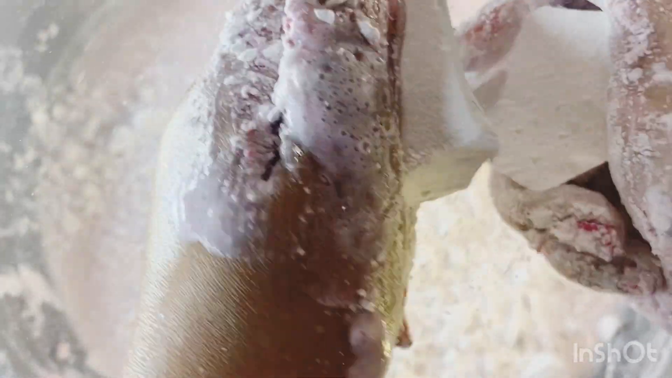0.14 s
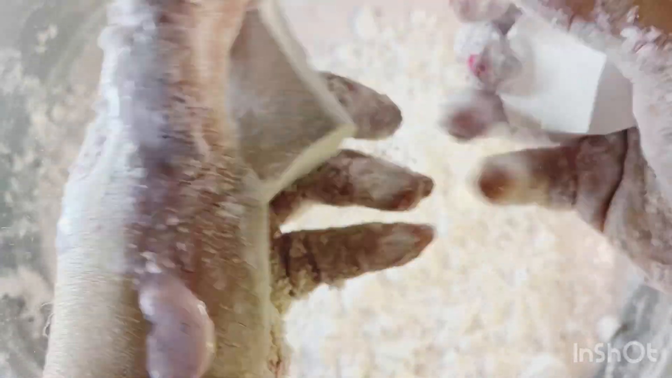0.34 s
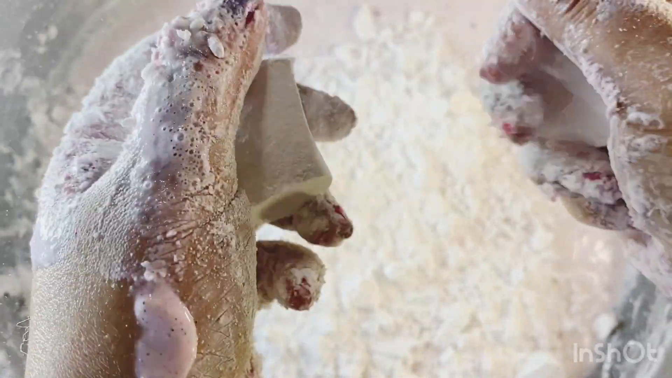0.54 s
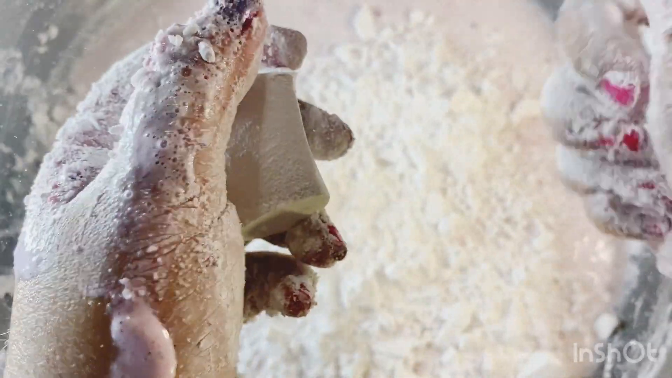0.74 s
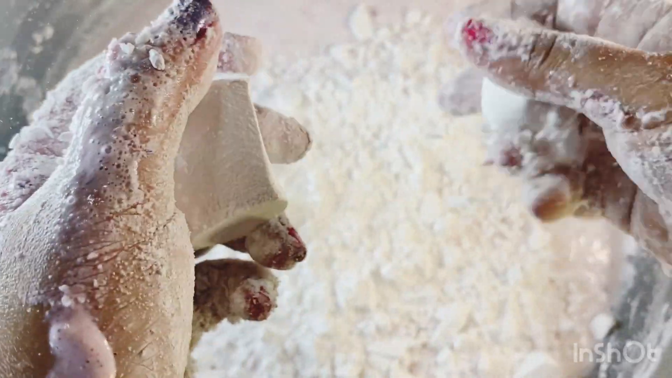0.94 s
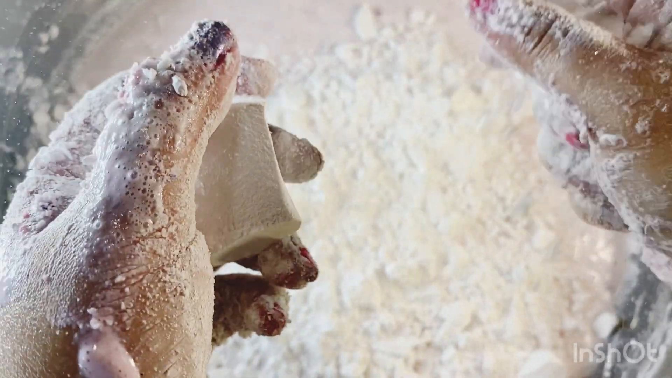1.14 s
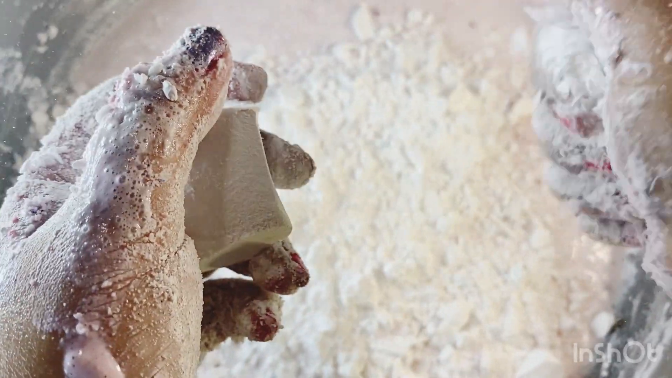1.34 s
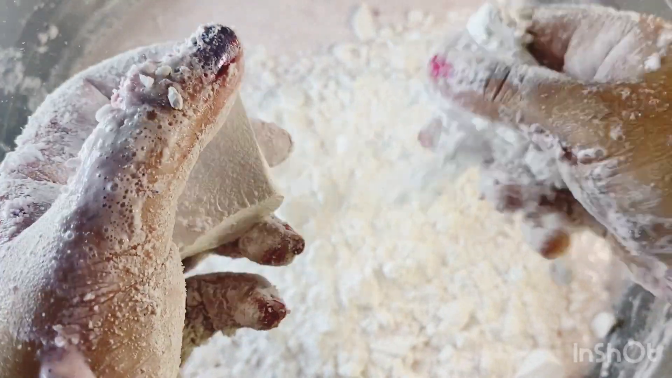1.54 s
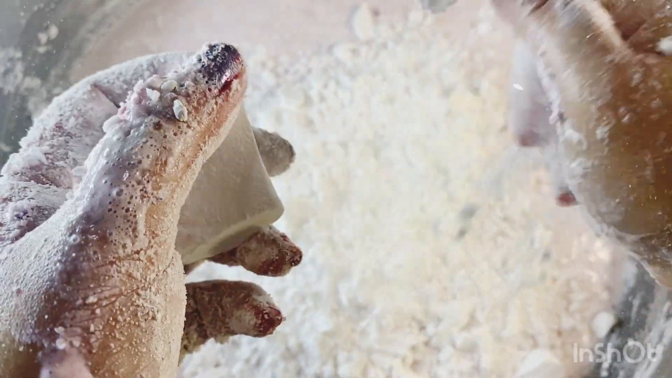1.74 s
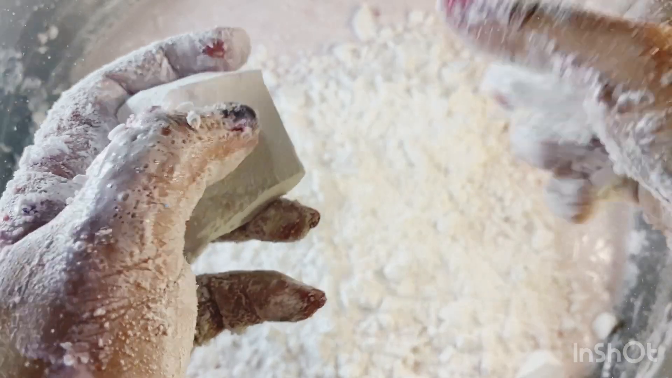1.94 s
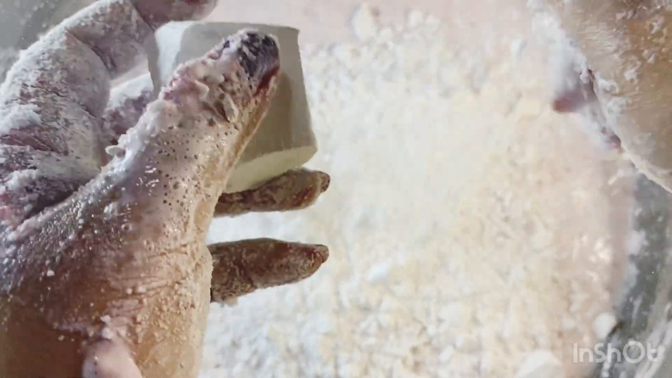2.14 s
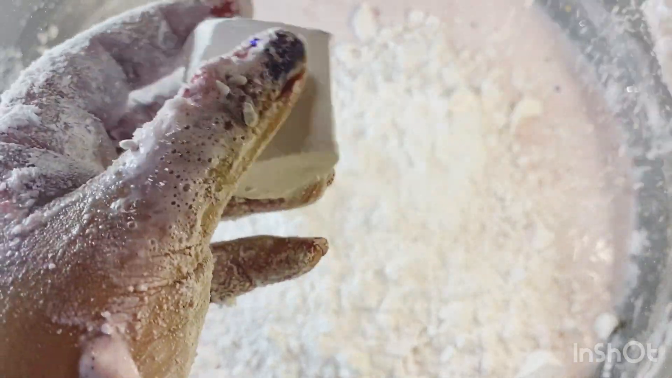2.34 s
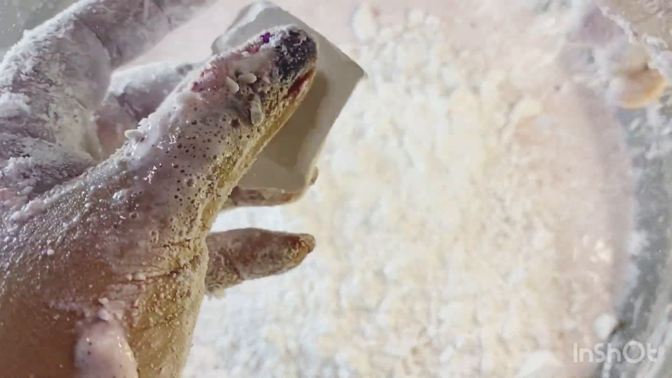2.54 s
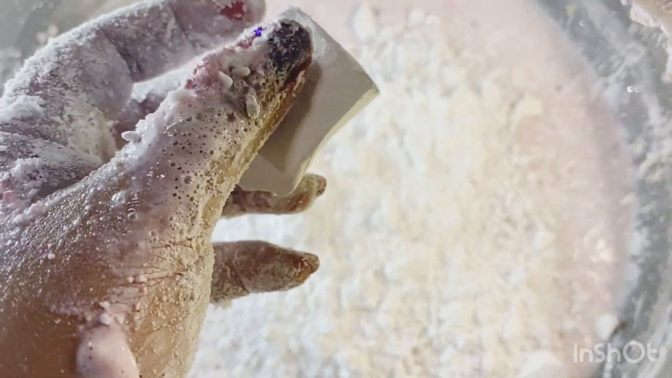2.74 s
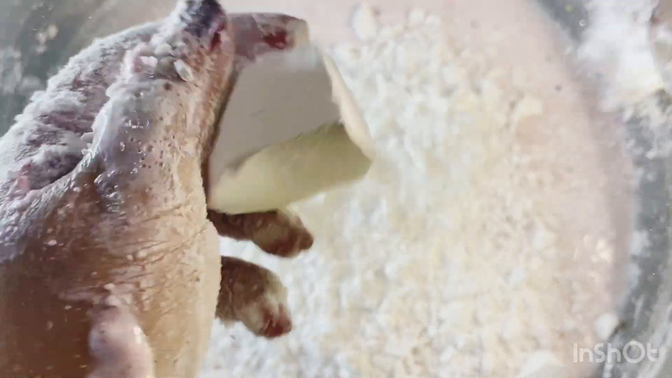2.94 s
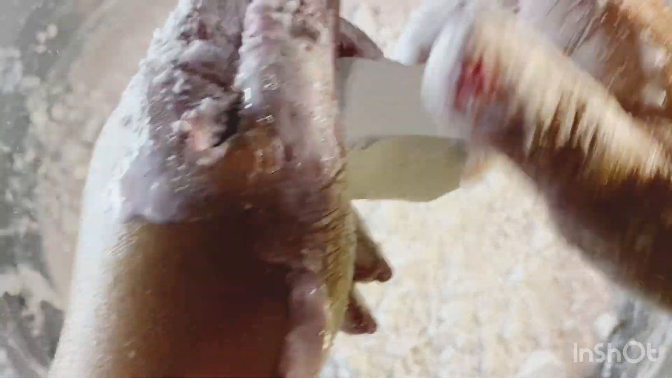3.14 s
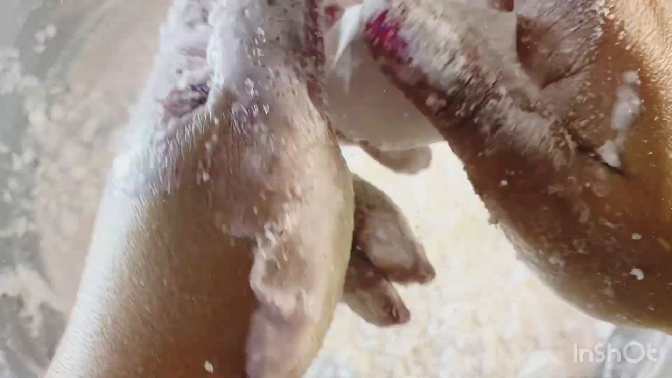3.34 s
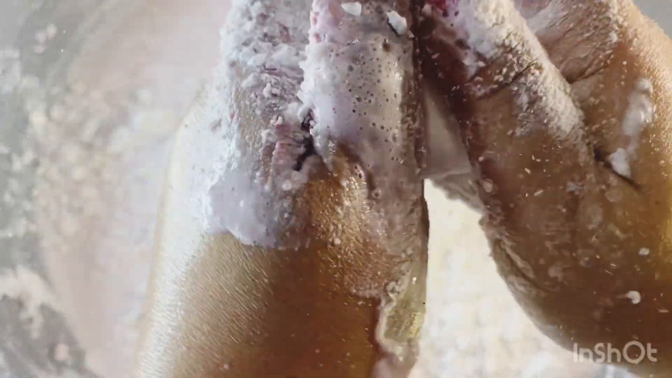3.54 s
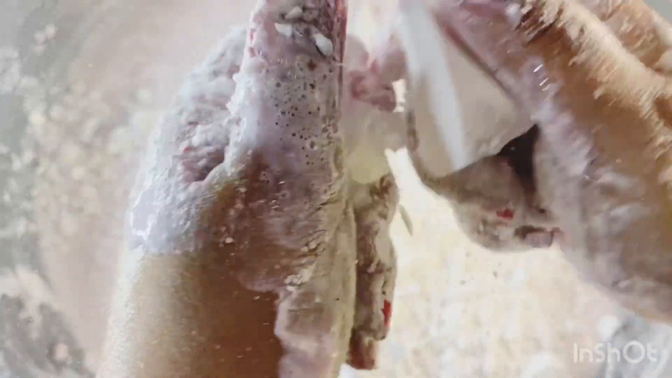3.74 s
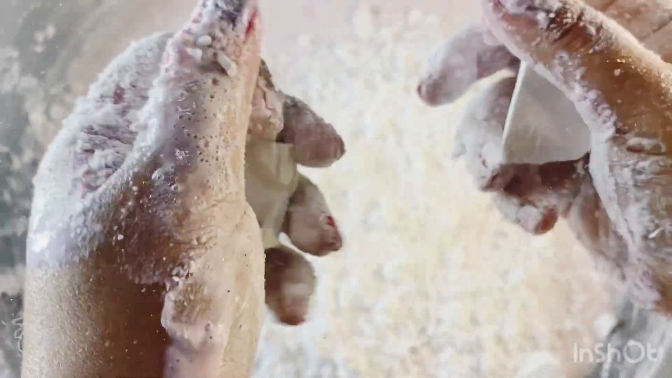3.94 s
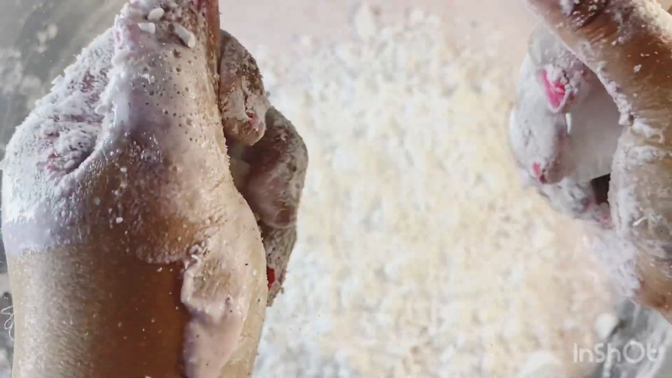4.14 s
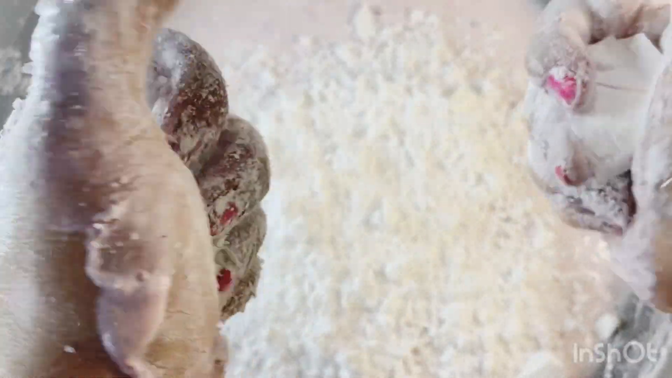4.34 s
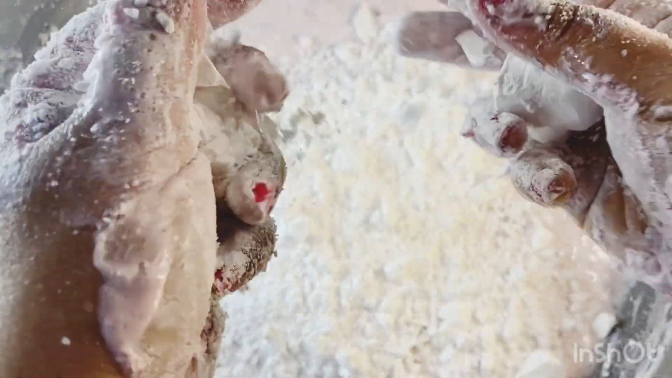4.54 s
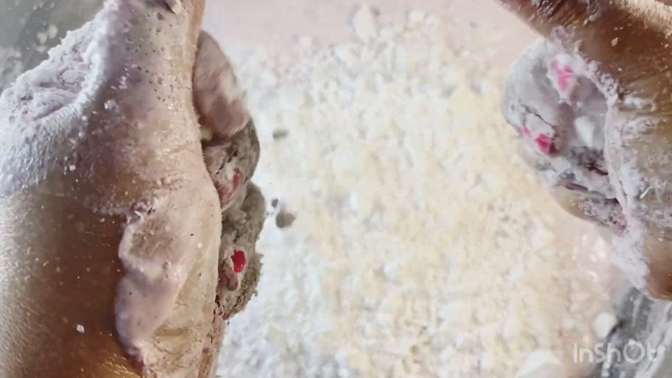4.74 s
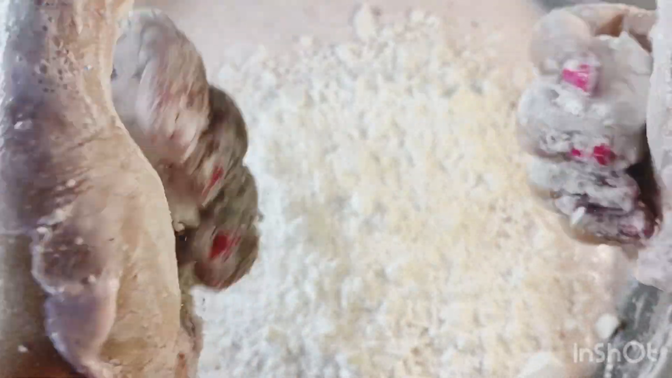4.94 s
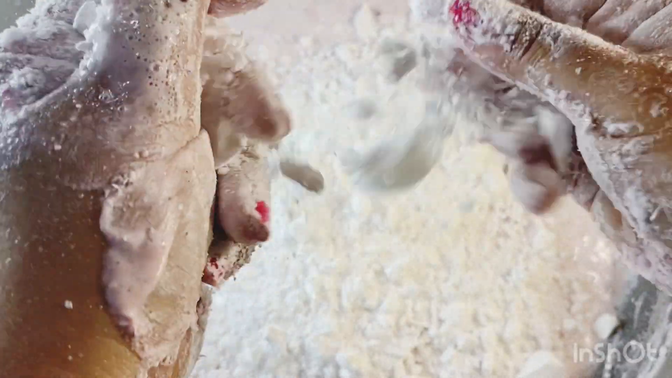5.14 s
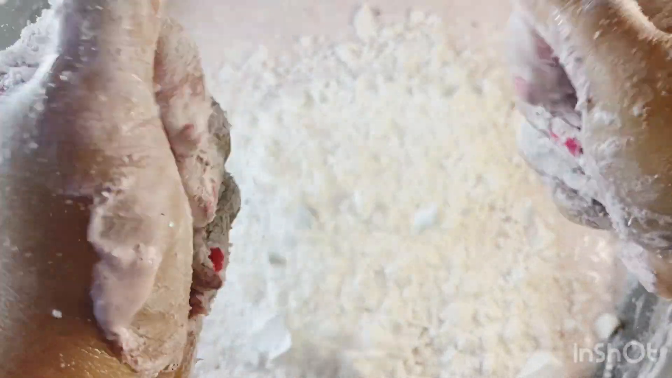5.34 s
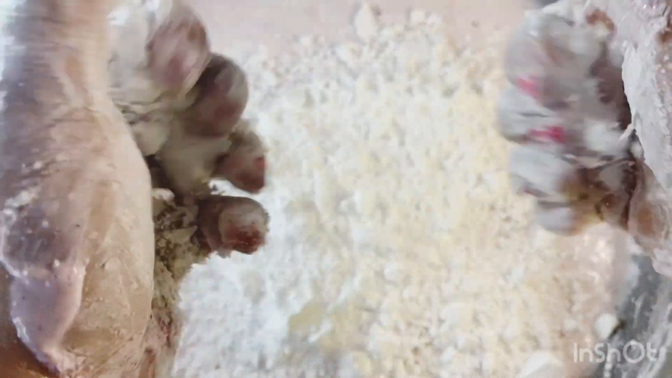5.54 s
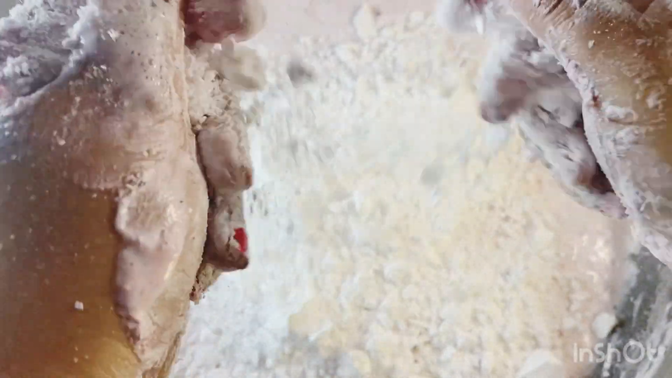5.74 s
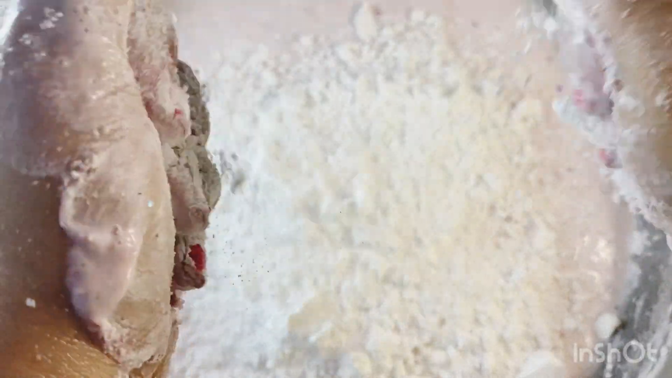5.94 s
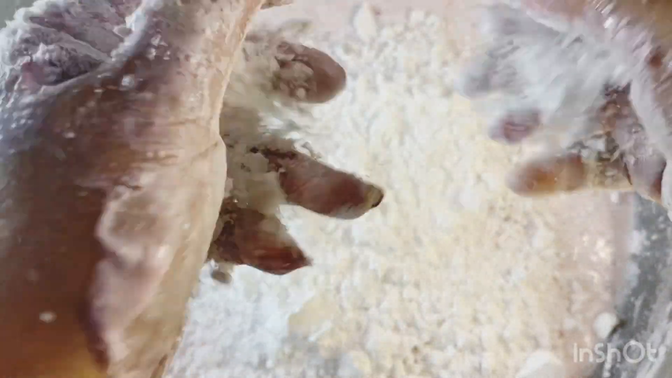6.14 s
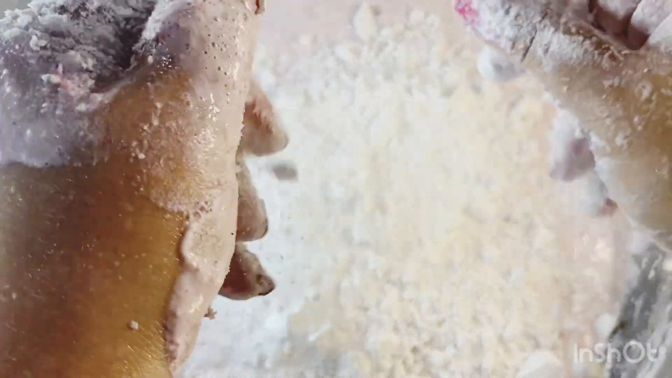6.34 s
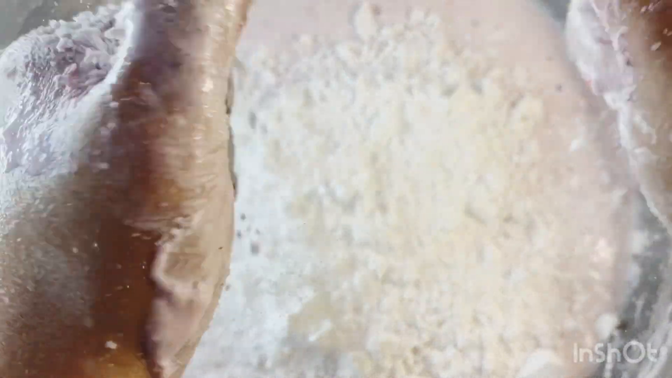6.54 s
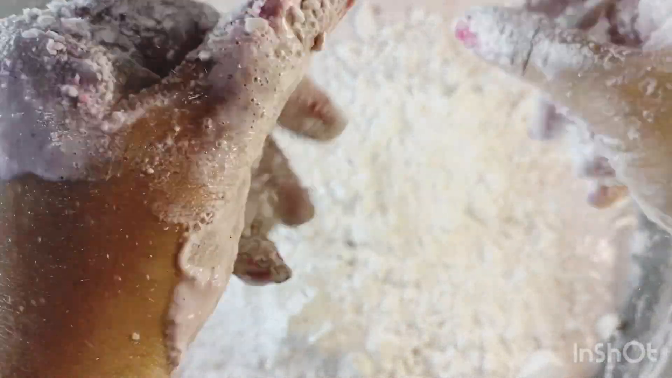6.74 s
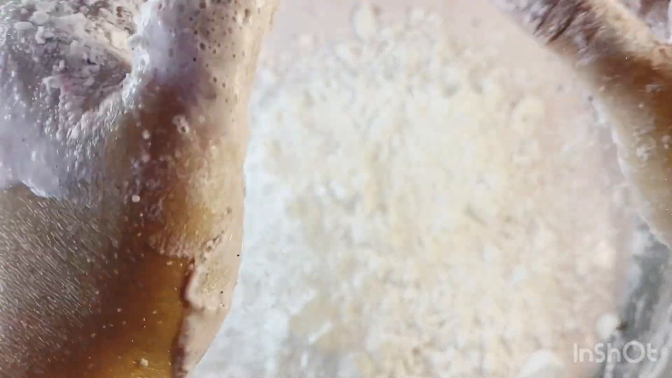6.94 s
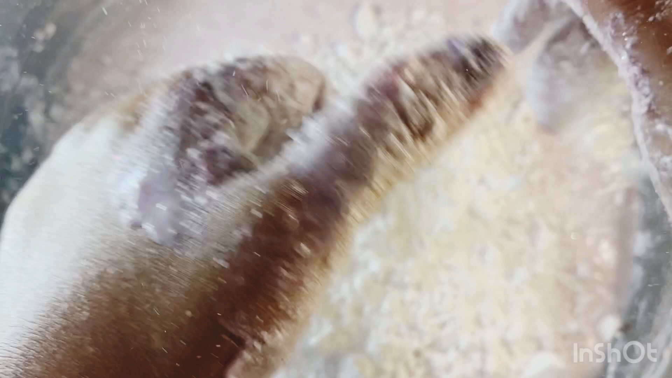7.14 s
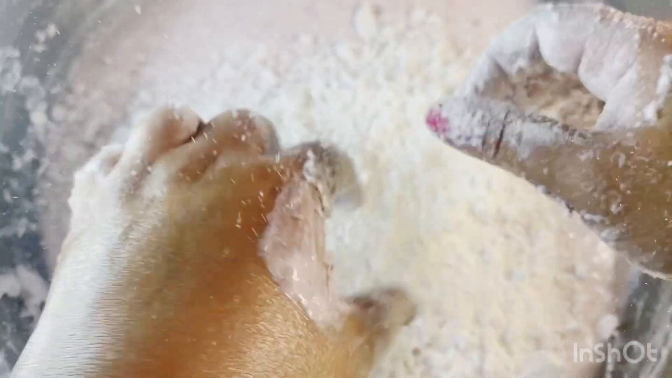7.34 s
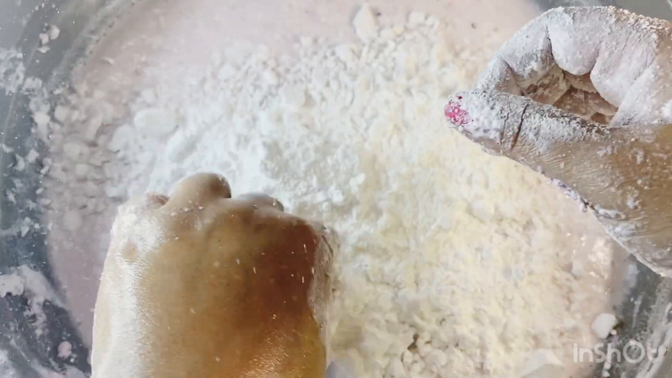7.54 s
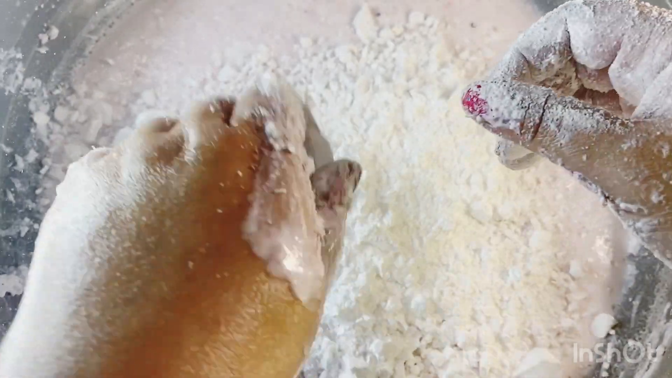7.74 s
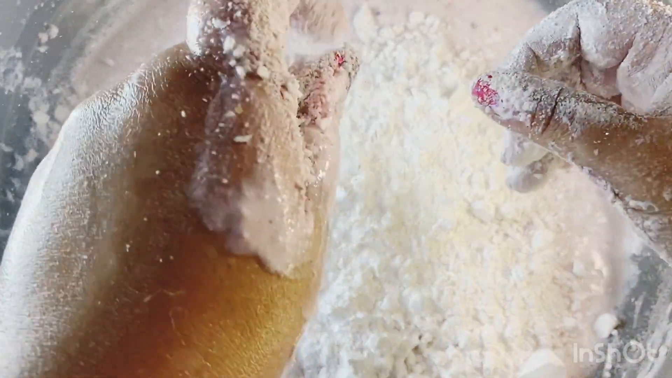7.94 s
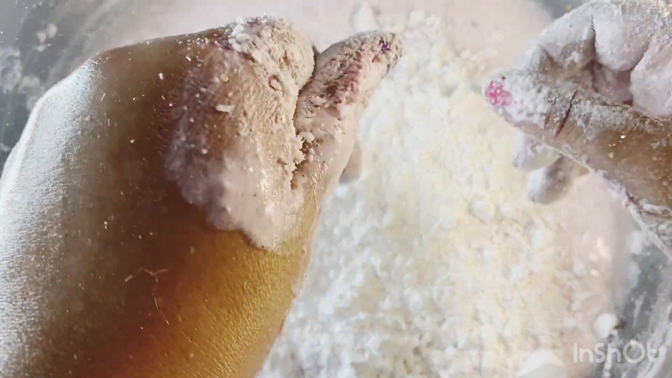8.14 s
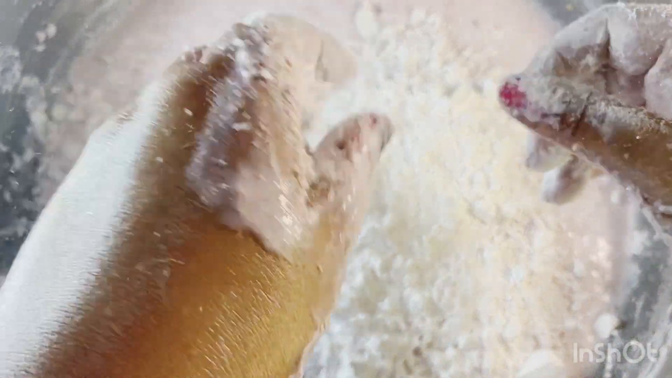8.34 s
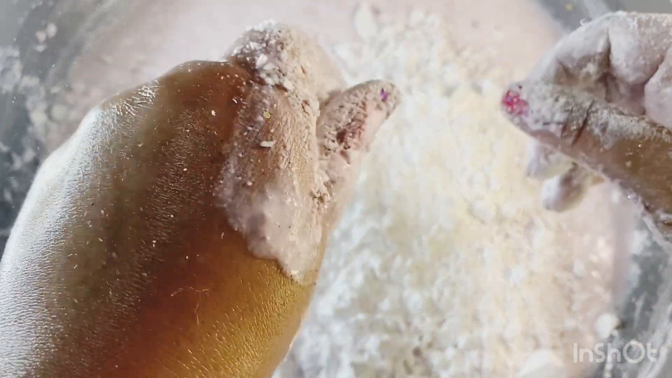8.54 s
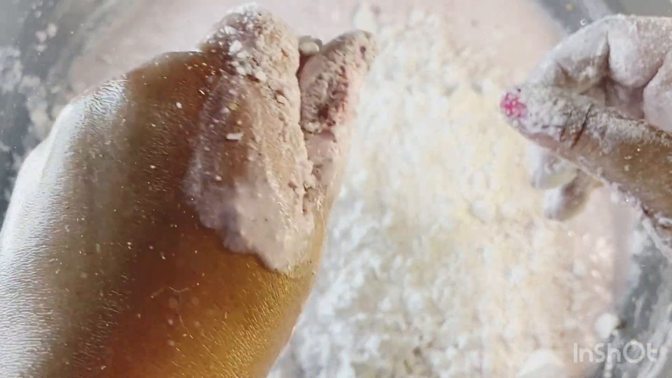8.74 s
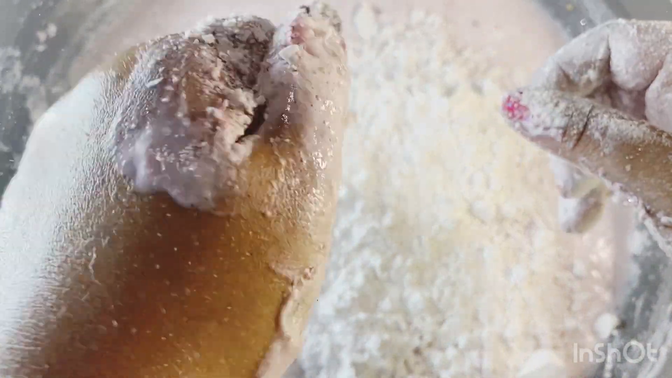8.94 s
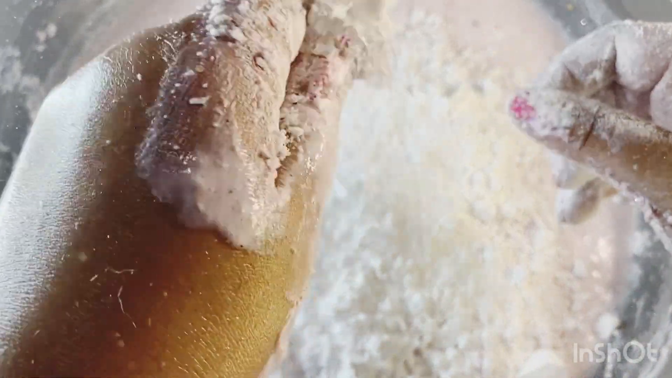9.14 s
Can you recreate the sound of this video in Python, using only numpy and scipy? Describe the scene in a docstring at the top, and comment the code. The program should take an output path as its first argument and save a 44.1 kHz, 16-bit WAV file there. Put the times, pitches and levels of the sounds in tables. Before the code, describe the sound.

Dry chalk blocks snap and crumble in the hands over a bowl, gritty crackle and loud cracks ringing into a long, smooth reverberation.

```python
"""Over a bowl of paste, in a long, smooth reverberation, dry chalk blocks are crushed by hand close up.
Each break is a brief burst of fractures, split into hollow body, crack and splinter; big pieces ring on.
Between the breaks grit crackles as random clicks, blocks rub in uneven slips and powder rustles as noise.
Lumps knock dully on the damped modes of the bowl; still air, hum and handling rumble lie beneath."""
import sys
import numpy as np
from scipy import signal
from scipy.io import wavfile

SR = 44100
rng = np.random.default_rng(int(sys.argv[2]) if len(sys.argv) > 2 else 0)


def wav_record(signal):
    """Record a signal, one row per channel, as 16-bit PCM in the file named by sys.argv[1]."""
    frames = np.transpose(np.atleast_2d(signal))
    bounded = np.clip(frames, -1, 1)
    # unit amplitude maps onto the largest positive 16-bit level
    quanta = np.round(bounded * 32767).astype(np.int16)
    wavfile.write(sys.argv[1], SR, quanta)


N = 406161
LEAD = SR // 10  # samples of run-up: the crushing is already under way at time zero
TIME = np.arange(-LEAD, N) / SR
SNAP_S = 0.004  # short sounds take their level as rms over this time


def from_db(db):
    """Decibels to gain."""
    return 10 ** (np.asarray(db) / 20)


def rms_one(x):
    """Scale to unit rms."""
    return x / np.sqrt(np.mean(x ** 2) + 1e-20)


def in_time(rows):
    """Each column of a curve at every sample."""
    s, *columns = np.transpose(rows)
    return [np.interp(TIME, s, column) for column in columns]


def at_hz(points, hz):
    """Read a table on a log-frequency axis."""
    table_hz, values = np.array(points).T
    return np.interp(np.log(hz), np.log(table_hz), values)


def band(x, low_hz, high_hz):
    """Butterworth band-pass."""
    edges = [low_hz, min(high_hz, 0.48 * SR)]
    return signal.sosfilt(signal.butter(2, edges, "band", fs=SR, output="sos"), x)


def bell(x, hz, q, gain_db):
    """A resonant peak or notch."""
    a = from_db(gain_db / 2)
    w = 2 * np.pi * hz / SR
    k = np.sin(w) / (2 * q)
    c = -2 * np.cos(w)
    return signal.lfilter([1 + k * a, c, 1 - k * a], [1 + k / a, c, 1 - k / a], x)


def add(track, s, sound):
    """Mix a sound in at time s."""
    at = max(round(s * SR) + LEAD, 0)
    track[at:at + len(sound)] += sound[:len(track) - at]


def swell(start_s, hold_s, rise_s, fall_s, t=TIME):
    """Exponential attack, hold and release of height 1; rise and fall are time constants."""
    before = np.minimum(t - start_s, 0) / rise_s
    after = np.maximum(t - start_s - hold_s, 0) / fall_s
    return np.exp(np.maximum(before - after, -30))


def noise_bands(size, channels=1, count=24):
    """Narrow bands of noise, unrelated between channels, as (centre Hz, noise)."""
    edges = np.geomspace(18, 17000, 25)[:count + 1]
    white = rng.standard_normal((2, channels, size))
    for k, (low, high) in enumerate(zip(edges, edges[1:])):
        yield np.sqrt(low * high), band(white[k % 2], low, high)


def fracture(t, run_s, ragged, crumble, crumble_s):
    """One sharp release, a dying run of smaller ones as the crack travels, then a brief crumbling."""
    decay = ragged * np.exp(-t / run_s) + crumble * np.exp(-t / crumble_s)
    burst = rng.standard_normal(len(t)) * decay
    burst[0] += 1
    return burst


def snaps(breaks, ring_q=3.9, ring_db=8, body_db=0, crack_db=0, splinter_db=0, top_db=-12):
    """Each fracture rings in its piece and is heard as hollow body, crack and bright splinter."""
    out = np.zeros(len(TIME))
    t = np.arange(SR // 50) / SR
    for s, ring_hz, body, crack, splinter in breaks:
        burst = fracture(t, run_s=0.00087, ragged=0.27, crumble=0.01, crumble_s=0.0029)
        burst = bell(burst, ring_hz, ring_q, ring_db)
        # the cupped hand hollows the sound
        burst = bell(bell(burst, 600, 4.8, -5.0), 1600, 14.0, -2.4)

        hollow = band(band(burst, 310, 1300), 160, 4800)
        middle = band(burst, 1590, 3100)
        bright = bell(band(burst, 4020, 10180), 10400, 8, -5.0)
        bright = bright + from_db(top_db) * band(burst, 11200, 13000)

        parts = from_db(body + body_db) * rms_one(hollow)
        parts = parts - from_db(crack + crack_db) * rms_one(middle)
        parts = parts + from_db(splinter + splinter_db) * rms_one(bright)
        add(out, s, parts * np.sqrt(SNAP_S * SR / len(t)))
    return out


def mode(hz, db, t60, wave=np.sin):
    """One dying resonance, its level as rms over SNAP_S; a cosine starts it with a sudden release."""
    t = np.arange(SR // 20) / SR
    ring = wave(2 * np.pi * hz * t) * np.exp(-np.log(1000) * t / t60)
    return from_db(db) * rms_one(ring) * np.sqrt(SNAP_S * SR / len(t))


def aftermath(thud_hz=125, thud_t60=0.033):
    """The biggest breaks leave their pieces ringing, neighbouring modes in opposite sense, and jar the hand."""
    # larger pieces that ring on: t/s, modes [(f/Hz, level/dB before the band-pass, t60/s), ..]
    ringing_pieces = [(-.012, [(1625, -12, 0.014), (2470, -14.5, 0.0083)]),
                      (.0005, [(1480, -18.5, 0.0055)]), (.0427, [(2860, -22, .006), (4400, -28, 0.0025)]),
                      (0.5364, [(763, -23, 0.0063), (2310, -18, 0.012), (2770, -19, 0.0084),
                      (3870, -30.5, .007), (6050, -23.5, .004), (9450, -24, .008)]),
                      (3.556, [(724, -18, 0.004), (1650, -13.5, 0.0036), (2280, -6, 0.0059)]),
                      (3.5664, [(5500, -14.5, 0.0031), (7150, -21, .008), (8500, -16, .003)]),
                      (4.758, [(4340, -19.5, 0.0032), (7600, -19.5, 0.0026)]),
                      (6.351, [(7820, -26.5, 0.0023)]), (7.7354, [(3750, -42.5, .006), (6700, -46, .004)]),
                      (8.6345, [(1240, -33, 0.012), (1960, -22, 0.016), (2580, -21.5, 0.0092),
                      (3000, -22.5, 0.0059), (3560, -21.5, 0.016), (4230, -24.5, 0.0068),
                      (5440, -26.5, .005), (6600, -23, 0.004)])]
    # low thuds as the hand recoils from a block giving way: t/s, level/dB
    recoils = [(0.538, -26), (1.023, -35), (1.118, -40.5), (3.557, -27.5), (4.759, -40.5)]
    out = np.zeros(len(TIME))
    for s, modes in ringing_pieces:
        ring = sum((-1) ** k * mode(*row, np.cos) for k, row in enumerate(modes))
        add(out, s, band(ring, 170, 11000))
    for s, db in recoils:
        add(out, s, mode(thud_hz, db, thud_t60))
    return out


def chips(grind_db, coarse, per_s=10, full_db=-50, size_db=-50, follows=0.46, spread_db=3,
          body_db=-10, crack_db=-2):
    """Small flakes snap off at random, more often and louder the harder the fingers grind; rows for snaps()."""
    effort_db = np.minimum(grind_db - full_db, 3)
    rate = per_s * coarse * from_db(0.6 * effort_db)
    at = np.flatnonzero(rng.random(len(TIME)) < rate / SR)
    chance = rng.standard_normal((len(at), 4))
    ring_hz = np.clip(4200 * 2 ** (1.04 * chance[:, 0]), 1800, 9000)
    overall_db = size_db + follows * effort_db[at]
    levels = overall_db[:, None] + [body_db, crack_db, 0] + spread_db * chance[:, 1:]
    return list(np.column_stack([TIME[at], ring_hz, levels]))


def grinding(press_s=0.032, release_s=0.04, trickle_db=-16, trickle_s=0.57):
    """Level (dB), brightness (dB) and coarse share: squeezes swell, hold and let go; crumbs trickle after."""
    # squeezes and rubs of the fingers:
    # start t/s, hold/s, grit level/dB, brightness/dB, share of coarse grains (0-1)
    squeezes = [(-.04, 0.045, -28.5, -5.5, 0.6), (.3, 0.087, -53, -2, 0.3), (1.05, 0.24, -47, -1.5, 0.85),
                (1.11, .04, -42.5, 3, 0.9), (1.62, 0.12, -49, 0, 0.78), (1.831, 0.035, -52.5, 0.5, 0.47),
                (2.041, 0.069, -50, 1, 0.97), (2.22, 0.046, -56, 0, 0.9), (2.62, 0.29, -59.5, 1, 0.64),
                (3.03, 0.088, -61.5, -6, 0.46), (3.591, 0.064, -38, -3.5, 0.96),
                (3.721, 0.095, -45, 4.5, 0.3), (3.88, 0.051, -50.5, 2.5, 0.43),
                (4.18, 0.053, -43.5, 2.5, 1), (4.56, 0.32, -48.5, 0, 0.6), (5.121, 0.027, -45, 4, .8),
                (5.2, 0.083, -45, 3.5, 0.56), (5.3, 0.19, -48, -2, 0.98), (5.689, 0.22, -50, 3, 0.86),
                (6.045, 0.014, -48.5, 0, 0.17), (6.29, 0.12, -51.5, 0.5, 0.5),
                (6.49, 0.048, -54, -2.5, 0.3), (6.819, 0.053, -55.5, -2, 0.66), (6.989, 0.013, -47.5, 0, 0),
                (7.169, 0.085, -63.5, 6, 0.7), (7.73, 0.042, -62.5, 1, 0.73), (9.03, 0.22, -64.5, 5, .3)]
    t = TIME[::40]
    power = colour = coarse = 0
    for s, hold_s, db, bright_db, share in squeezes:
        press = swell(s, hold_s, press_s, release_s, t)
        trickle = from_db(trickle_db) * swell(s, hold_s, press_s, trickle_s, t)
        own = (from_db(db) * np.maximum(press, trickle)) ** 2
        power = power + own
        # the stronger squeeze decides the colour and the grain
        colour = colour + own * bright_db
        coarse = coarse + own * share
    curves = 10 * np.log10(power), colour / power, np.clip(coarse / power, 0, 1)
    return [np.interp(TIME, t, curve) for curve in curves]


def grit(grind_db, bright_db, per_s, spread_db, own_db, level_db):
    """Tiny grains give way at random, each with a size and colour of its own."""
    # colour of the grit: f/Hz, level/dB
    grain_colour = [(300, 4), (600, 3.5), (1100, 0), (1500, 3), (2300, 5.5), (3400, 1.5), (5500, -3),
                    (8000, 2.5), (10500, -10.5), (15000, -30)]
    at = np.flatnonzero(rng.random(len(TIME)) < per_s / SR)
    size_db = spread_db * np.minimum(rng.exponential(1, len(at)), 4.5)
    sizes = from_db(size_db) * rng.choice([-1, 1], len(at))
    edges = np.geomspace(220, 16000, 14)
    out = 0
    for low, high in zip(edges, edges[1:]):
        hz = np.sqrt(low * high)
        tilt_db = bright_db[at] * np.clip(np.log2(hz / 3500), -1, 1)
        chance_db = own_db * np.clip(rng.standard_normal(len(at)), -1, 1)
        clicks = np.full(len(TIME), 1e-18)
        clicks[at] = sizes * from_db(at_hz(grain_colour, hz) + tilt_db + chance_db)
        out = out + band(clicks, low, high)
    return from_db(grind_db + level_db) * rms_one(out)


def knocks(contact_hz=1500, level_db=0, scuff_db=-21, scuff_s=0.0048, attack_s=0.0004):
    """A soft blow rings the damped bowl; harder ones reach the upper modes and scuff as they settle."""
    # dull knocks of lumps and hands in the bowl: t/s, level/dB before the modes, pitch f/Hz, hardness/dB
    blows = [(.163, -10.5, 383, -5), (.177, -7.5, 343, 4.5), (2.754, -38, 428, 15.5), (3.397, -45, 380, 9),
             (3.424, -35.5, 360, 10), (3.495, -34, 730, -8), (4.876, -28.5, 360, -6),
             (5.378, -37, 384, -19), (5.434, -29, 372, -24), (5.455, -28, 400, -19.5), (5.467, -32, 383, 5),
             (5.484, -19.5, 394, 11.5), (5.4994, -21, 386, 12)]
    # modes of the bowl: multiple of the pitch, level/dB, t60/s
    bowl_modes = [(.62, -14, 0.035), (1, -1.5, 0.054), (1.25, -1, 0.017), (1.84, -15.5, 0.04),
                  (2.7, -10, 0.0085), (3.6, -19, 0.015)]
    out = np.zeros(len(TIME))
    t = np.arange(SR // 8) / SR
    for s, db, pitch, hard_db in blows:
        scuff = rms_one(band(rng.standard_normal(len(t)), 350, 1200)) * np.exp(-t / scuff_s)
        ring = from_db(db + scuff_db + hard_db) * scuff
        for multiple, mode_db, t60 in bowl_modes:
            # each blow detunes the modes, more so the further they lie from the pitch
            hz = pitch * multiple * (1 + 0.082 * rng.standard_normal() * (multiple - 1))
            gain = from_db(db + mode_db + hard_db * np.clip(np.log2(multiple), 0, 1))
            ring = ring + gain * np.sin(2 * np.pi * hz * t) * np.exp(-np.log(1000) * t / t60)
        softened = ring * (1 - np.exp(-t / attack_s))
        add(out, s, from_db(level_db) * band(softened, 110, contact_hz))
    return out


def rubs(slips_per_s=700, hollow_t60=0.022, block_t60=0.012, block_db=0, rasp_db=-5,
         rise_s=0.006, fall_s=0.013):
    """Blocks rub: uneven slips sound the hollow of the hand and the block, with a dull rasp."""
    # rubs of block on block: start t/s, hold/s, level/dB, hollow of the hand f/Hz, ring of the block f/Hz
    block_rubs = [(3.424, 0.0076, -49, 324, 720), (3.475, 0.023, -57, 325, 740),
                  (4.295, 0.016, -45, 398, 910), (4.327, 0.014, -41, 420, 880)]
    out = 0
    for s, hold_s, db, hollow_hz, block_hz in block_rubs:
        slips = (rng.random(len(TIME)) < slips_per_s / SR) * rng.standard_normal(len(TIME))
        response = mode(hollow_hz, 0, hollow_t60) - mode(block_hz, block_db, block_t60)
        rings = signal.oaconvolve(slips, response)[:len(TIME)]
        rasp = band(slips + 1e-18, 260, 1400)
        sound = rms_one(rings) + from_db(rasp_db) * rms_one(rasp)
        out = out + from_db(db) * swell(s, hold_s, rise_s, fall_s) * sound
    return out


def rustles(grain_db=4, width_hz=900, hiss_low_hz=4800, hiss_high_hz=9500):
    """Fine powder rasps between sliding fingertips, the resonance of their gap gliding, and hisses above it."""
    # slides through powder:
    # start t/s, length/s, rasp level/dB, resonance at the start f/Hz, at the end f/Hz, hiss level/dB
    slides = [(4.535, 0.046, -52, 2700, 2480, -53), (4.925, 0.046, -49, 2400, 2213, -60),
              (6.189, 0.075, -61, 2400, 2000, -57), (7.347, 0.072, -61, 1800, 1995, -67.5),
              (7.45, 0.079, -66, 2100, 2000, -69), (7.969, 0.093, -64.5, 2750, 2450, -63),
              (8.059, 0.092, -60, 2450, 1890, -61), (8.229, 0.055, -67, 2400, 2200, -60)]
    out = np.zeros(len(TIME))
    lowpass = signal.butter(2, width_hz / 2, fs=SR, output="sos")
    for s, length_s, db, from_hz, to_hz, hiss_db in slides:
        size = int(length_s * SR)
        chance = rng.standard_normal((3, SR // 4))[:, :size]
        grains = chance[:2] * from_db(grain_db * chance[2])
        # low noise times a gliding tone gives a noise band around the glide
        glide = np.cos(2 * np.pi * np.cumsum(np.linspace(from_hz, to_hz, size)) / SR)
        rasp = glide * signal.sosfilt(lowpass, grains[0])
        hiss = band(grains[1], hiss_low_hz, hiss_high_hz)
        sound = from_db(db) * rms_one(rasp) + from_db(hiss_db) * rms_one(hiss)
        add(out, s, np.sin(np.linspace(0, np.pi, size)) * sound)
    return out


def reflections(x, near_db=-14.5, near_t60=0.16):
    """Quick echoes from bowl, table and walls reach the one microphone."""
    t = np.arange(SR // 4) / SR
    echoes = band(rng.standard_normal(len(t)), 160, 8000)
    echoes = echoes * np.exp(-np.log(1000) * t / near_t60) * (t > 0.002)
    response = from_db(near_db) * rms_one(echoes) / np.sqrt(len(t))
    return signal.fftconvolve(x, response)[:len(x)]


def hall(x, hall_db=-13, delay_s=0.033, swell_s=0.026, sheen_hz=9350, sheen_db=4, top_hz=9800):
    """A long, late tail, different in each ear, with an airy resonance just under its steep upper edge."""
    # colour of the reverberation: f/Hz, level/dB
    hall_colour = [(25, -1), (100, -3), (220, -1.5), (350, -1.5), (600, -2), (1200, -1), (1800, -1.5),
                   (2500, 0.5), (4000, -2.5), (6000, -2.5), (8000, 1), (10000, 6)]
    # its decay: f/Hz, t60/s
    hall_decay = [(100, 2.8), (500, 2.38), (2500, 2.4), (6000, 2.42), (9500, 1.97)]
    t = np.arange(int(2.5 * SR)) / SR
    tail = 0
    for hz, noise in noise_bands(len(t), channels=2):
        decay = np.exp(-np.log(1000) * t / at_hz(hall_decay, hz))
        tail = tail + noise * from_db(at_hz(hall_colour, hz)) * decay
    tail = tail * np.clip((t - delay_s) / swell_s, 0, 1)
    tail = bell(tail, sheen_hz, 15.0, sheen_db)
    tail = signal.sosfilt(signal.butter(20, top_hz, fs=SR, output="sos"), tail)
    response = from_db(hall_db) * rms_one(tail) / np.sqrt(len(t))
    return signal.fftconvolve(x[None], response, axes=1)[:, :len(x)]


def background(air_db=-61, rumble_db=-1, hum_db=-72, jolt_rise_s=0.015, jolt_fall_s=0.032):
    """Still air, a faint mains hum, and low rumble that swells as the hands work."""
    # colour of the still air: f/Hz, level/dB
    air_colour = [(20, -8), (60, -4), (120, -8), (180, -7.5), (350, -5), (600, -11), (1200, -17.5),
                  (3000, -19), (8000, -20), (15000, -26.5)]
    # colour of the rumble: f/Hz, level/dB
    rumble_colour = [(20, 6), (45, 1), (75, -5), (140, -14.5), (280, -18), (600, -50.5)]
    # handling rumble between the jolts: t/s, level/dB before rumble_db
    rumble_level = [(0, -68), (1.4, -57), (2.4, -55), (3.1, -57), (3.7, -52.5), (5.4, -52), (6.5, -58.5),
                    (7.1, -66), (9.2, -70)]
    # the hands jerk and push air at the microphone: t/s, level/dB before rumble_db
    jolts = [(0, -19), (0.539, -37.5), (1.032, -34), (2.559, -53), (3.41, -44), (3.561, -34), (3.86, -41),
             (6.81, -49)]
    air = sum(from_db(at_hz(air_colour, hz)) * noise[0] for hz, noise in noise_bands(len(TIME)))
    rumble = sum(from_db(at_hz(rumble_colour, hz)) * noise[0]
                 for hz, noise in noise_bands(len(TIME), count=12))
    handling = from_db(in_time(rumble_level)[0])
    for s, db in jolts:
        handling = handling + from_db(db) * swell(s, 0, jolt_rise_s, jolt_fall_s)
    hum = from_db(hum_db) * np.sin(2 * np.pi * 120 * TIME)
    return from_db(air_db) * rms_one(air) + from_db(rumble_db) * handling * rms_one(rumble) + hum


def scene():
    """Chalk, bowl and background in the middle, the wide reverberation around them."""
    # the clearest breaks, levels as rms over SNAP_S:
    # t/s, ring of the piece f/Hz, hollow body level/dB, crack level/dB, splinter level/dB
    clear_breaks = [(-0.012, 3600, -6, -21, -24), (0.0423, 2920, -33, -19, -25.5),
                    (0.448, 2880, -66, -38.5, -47), (0.5367, 4220, -20, -38, -23),
                    (0.556, 4240, -59, -58, -34), (0.6385, 6240, -58, -39.5, -33),
                    (1.0214, 2690, -31, -21.5, -25), (1.0293, 2700, -38, -40, -42),
                    (1.034, 2700, -43, -43, -43), (1.0744, 5000, -52, -43, -37),
                    (1.0417, 2613, -34, -38, -33), (1.057, 2850, -41, -34, -38),
                    (1.098, 2720, -36, -34, -29.5), (1.118, 2800, -33.5, -45, -35),
                    (1.1285, 5700, -62, -39, -32.5), (1.1495, 2880, -64, -33, -37),
                    (1.2022, 2504, -47, -47, -46), (1.2115, 4130, -63, -36.5, -29),
                    (1.255, 7010, -61.5, -57, -44), (1.375, 2045, -48.5, -46.5, -54.5),
                    (1.5759, 2380, -60, -44, -57), (1.6628, 7800, -74, -54, -34.5),
                    (1.6859, 8340, -78, -50, -29.5), (1.7156, 2110, -39.5, -40, -39),
                    (1.8598, 2600, -61, -43.5, -51), (2.0516, 4500, -56, -48, -49),
                    (2.058, 2700, -47.5, -41, -38.5), (2.2298, 2380, -34.5, -36, -36.5),
                    (2.5937, 6170, -68, -43.5, -45), (2.6006, 6200, -63, -51, -46),
                    (2.6353, 6360, -66, -48, -36.5), (2.643, 8400, -64, -43.5, -35),
                    (2.688, 6040, -45.5, -34.5, -29.5), (3.022, 3680, -55.5, -50.5, -46.5),
                    (3.266, 5920, -55, -64, -50.5), (3.495, 2550, -43, -53, -45.5),
                    (3.556, 2400, -18.5, -22.5, -28), (3.557, 419, -21.5, -28, -50),
                    (3.563, 6000, -36, -36, -33), (3.5666, 8850, -24, -28, -25),
                    (3.6436, 7640, -45, -45, -33), (4.0565, 2600, -52, -41, -45),
                    (4.0681, 7540, -37, -31.5, -26.5), (4.072, 7100, -46, -38, -30.5),
                    (4.1818, 1720, -27.5, -47, -33.5), (4.1971, 1700, -29.5, -43, -55),
                    (4.2077, 5000, -59, -56, -44), (4.2223, 4440, -61, -47, -45),
                    (4.245, 7450, -57, -51, -46), (4.252, 9400, -58, -57, -39),
                    (4.489, 4500, -62, -49, -45), (4.5665, 2600, -61, -48, -52),
                    (4.5938, 2620, -44.5, -33.5, -38.5), (4.5982, 5000, -61, -41, -42),
                    (4.697, 2660, -65, -40.5, -37), (4.723, 6250, -47, -38, -25),
                    (4.74, 2450, -48, -43, -45), (4.758, 4030, -27.5, -29, -29),
                    (4.7697, 4370, -50, -49, -37), (5.151, 3520, -50, -39, -42),
                    (5.1592, 3100, -46, -42, -39), (5.2036, 3550, -42, -29, -28),
                    (5.213, 2300, -44, -35, -39), (5.24, 1970, -42, -41, -43),
                    (5.2675, 3220, -38, -43, -44), (5.3014, 2120, -38, -37.5, -53),
                    (5.326, 7900, -59, -44, -36.5), (5.3392, 2190, -52, -37.5, -42),
                    (5.3783, 2970, -51, -52, -47), (5.4426, 6000, -54, -50, -48),
                    (5.6886, 5000, -53, -51, -45), (5.7073, 8130, -64, -63, -39),
                    (5.7264, 2256, -37, -36.5, -39.5), (5.749, 1301, -48, -45, -52),
                    (5.7979, 2210, -51, -41, -39.5), (5.8073, 1770, -32, -30.5, -70),
                    (5.827, 2600, -50, -41, -54), (5.8302, 8900, -58, -52, -42),
                    (5.8446, 2710, -50, -40, -56), (5.881, 9000, -39.5, -55, -39.5),
                    (6.0106, 2700, -62, -52, -47.5), (6.146, 5880, -71, -57, -42),
                    (6.2404, 7000, -68, -60, -51), (6.288, 3300, -48, -39.5, -41.5),
                    (6.3034, 3110, -55, -57, -48), (6.317, 1280, -48.5, -57, -56),
                    (6.351, 7700, -51, -44, -39), (6.389, 1760, -47.5, -59, -62),
                    (6.422, 1144, -48.5, -62, -58), (6.77, 2370, -59, -55, -50.5),
                    (6.8307, 1910, -49, -45.5, -44.5), (7.0845, 3000, -64, -51, -54),
                    (7.178, 7600, -70.5, -56, -46), (7.193, 7520, -71, -51.5, -45.5),
                    (7.25, 8620, -67.5, -57, -46), (7.287, 2150, -65, -58, -51),
                    (7.7351, 7650, -51.5, -54, -38), (8.072, 1840, -54, -57, -61),
                    (8.1027, 1510, -42, -56, -61.5), (8.2727, 2400, -60.5, -57.5, -60.5),
                    (8.463, 1604, -63, -54, -60), (8.6345, 8300, -28.5, -29, -26.5),
                    (8.6406, 1940, -28, -36, -37)]
    grind_db, bright_db, coarse = grinding()
    crumbs = grit(grind_db, bright_db, per_s=2200, spread_db=6.5, own_db=10.5, level_db=-0.5)
    powder = grit(grind_db, bright_db, per_s=6000, spread_db=4.0, own_db=7.5, level_db=-3.0)
    grains = np.sqrt(coarse) * crumbs + np.sqrt(1 - coarse) * powder
    breaking = snaps(clear_breaks) + aftermath() + snaps(chips(grind_db, coarse))
    close = breaking + grains + knocks() + rubs() + rustles()
    middle = close + reflections(close) + background()
    return (middle + hall(middle))[:, LEAD:]


def record(dry, cutoff_hz=17300):
    """Peaks beyond full scale clip; a steep low-pass cuts the top."""
    lowpass = signal.cheby2(12, 70, cutoff_hz, fs=SR, output="sos")
    return signal.sosfilt(lowpass, np.clip(dry, -1, 1))


dry = scene()
out = record(dry)
wav_record(out)
```